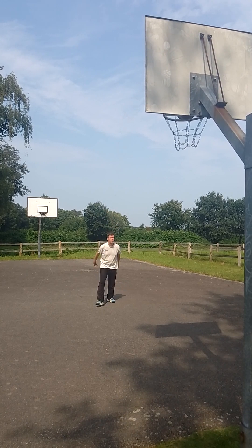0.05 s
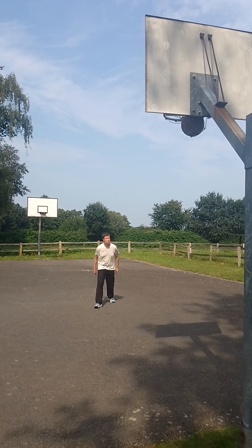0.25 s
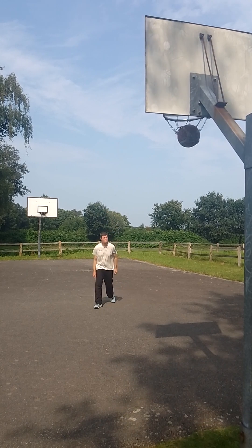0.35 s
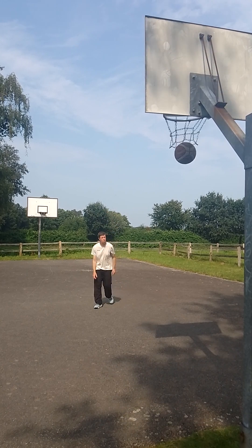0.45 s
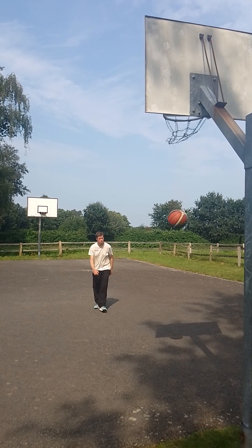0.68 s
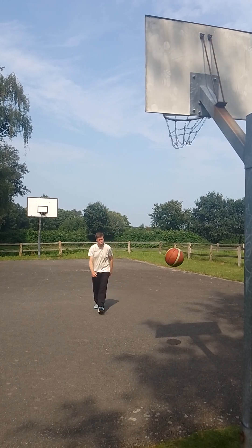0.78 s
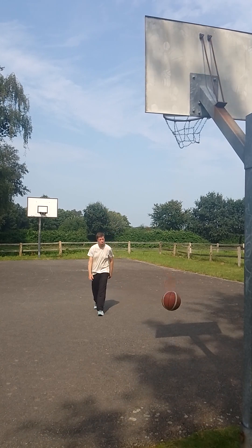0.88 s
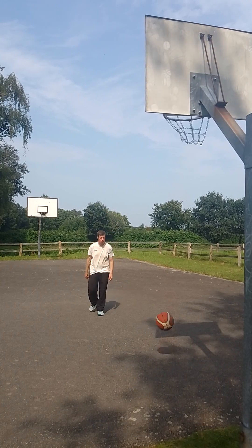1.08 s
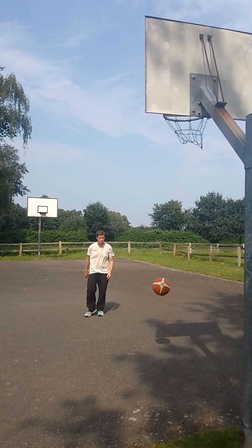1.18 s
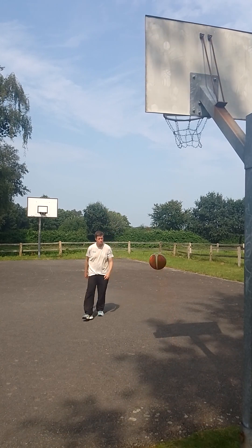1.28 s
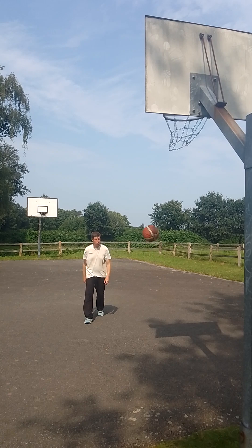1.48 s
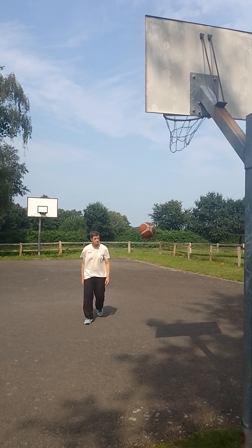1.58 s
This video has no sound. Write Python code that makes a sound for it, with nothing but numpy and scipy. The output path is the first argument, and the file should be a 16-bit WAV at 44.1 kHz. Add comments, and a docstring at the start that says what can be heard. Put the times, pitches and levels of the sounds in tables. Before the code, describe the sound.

A basketball rattles through a chain-net hoop, links tinkle, then it bounces once on asphalt outdoors

```python
"""An open court outdoors: a basketball drops through a hoop with a chain net, then bounces once on asphalt.
Random link contacts, shaped in bursts, excite the damped modes of rim and backboard; the links then tinkle
through narrow resonances as the net swings out. The bounce is a slap of short skin modes and its duller echo,
a swell of mid-band noise, the ringing air inside the ball and scattered noise, with a thin high tone after it.
Filtered clicks give the faint scuff of shoes; shaped noise gives the insects in the grass and the open air."""
import sys
import numpy as np
from scipy import signal
from scipy.fft import rfft, irfft
from scipy.io import wavfile

SR = 44100
rng = np.random.default_rng(int(sys.argv[2]) if len(sys.argv) > 2 else 0)


def int16_out(signal):
    """Quantize to a 16-bit WAV file."""
    q = np.round(np.clip(np.atleast_2d(signal).T, -1, 1) * 32767)
    wavfile.write(sys.argv[1], SR, q.astype(np.int16))


N = 72765  # samples


def undb(db):
    """Amplitude ratio of a level in decibels."""
    return 10 ** (np.asarray(db) / 20)


def unit(x):
    """Normalisation to a root-mean-square value of 1."""
    return x / np.sqrt(np.mean(x ** 2))


def since(start):
    """Elapsed time in seconds since a moment, zero before it."""
    return np.maximum(np.arange(N) / SR - start, 0)


def decay(t, t60):
    """Exponential damping: the amplitude falls by 60 dB in t60 seconds."""
    return np.exp(-np.log(1000) * t / t60)


def burst(start, rise, t60):
    """Envelope of a transient: linear rise, then exponential decay."""
    return np.minimum(since(start) / rise, 1) * decay(since(start + rise), t60)


def colour(x, points):
    """Minimum-phase filtering: the folded cepstrum makes a causal filter of unit power gain."""
    hz, db = np.array(points).T
    grid_hz = np.arange(N + 1) * SR / (2 * N)
    gain = undb(np.interp(np.log(grid_hz + 1), np.log(hz), db))
    cepstrum = irfft(np.log(unit(gain)))
    cepstrum[1:N] *= 2
    cepstrum[N + 1:] = 0
    response = np.exp(rfft(cepstrum))
    return irfft(rfft(x, 2 * N) * response)[:N]


def band(x, hz, kind, order=2):
    """Butterworth filtering: a maximally flat passband."""
    return signal.sosfilt(signal.butter(order, hz, kind, fs=SR, output="sos"), x)


def around(x, hz, width):
    """Band-pass filtering as a narrow resonance centred on one frequency."""
    return band(x, [hz - width / 2, hz + width / 2], "band")


def noise():
    """White noise: equal expected power at every frequency."""
    return rng.standard_normal(N)


def clicks(rate):
    """Random impulses: contacts at an average rate per second, of uneven strength and either sign, rms 1."""
    spread_db = 4
    contact = rng.random(N) < rate / SR
    sign = np.sign(noise())
    strength = undb(spread_db * np.clip(noise(), -2, 2))
    return unit(contact * sign * strength)


def ring(modes, start):
    """Modal superposition: modes struck together build up and decay; neighbours swing opposite ways."""
    build_cycles = 1  # time constant of the build-up, in cycles of the mode
    t = since(start)
    total = 0
    for k, (hz, db, t60) in enumerate(modes):
        swing = (-1) ** k * undb(db) * np.sin(2 * np.pi * hz * t)
        build_up = 1 - np.exp(-t * hz / build_cycles)
        total = total + swing * build_up * decay(t, t60)
    return total


def through(x, response):
    """Convolution: a linear system driven by x, its impulse response scaled to unit energy."""
    return signal.fftconvolve(x, unit(response))[:N] / np.sqrt(N)


def metal(t60, count):
    """Modal density: inharmonic modes, one at a random place in each equal slice of the spectrum."""
    bins = ((np.arange(count) + rng.random(count)) * (N // 2) / count).astype(int)
    lines = np.zeros(N // 2 + 1, complex)
    lines[bins] = np.exp(2j * np.pi * rng.random(count))
    return irfft(lines, N) * burst(0, 0.0016, t60)


def outdoors():
    """Spectral shaping of noise: insects buzz in a narrow high band over quiet open air."""
    # spectra of insects and open air, relative per hertz: f/Hz, level/dB
    insect_spectrum = [(6000, -35), (7600, -19.5), (8150, 4.5), (8600, -6), (9200, 6.5), (9800, -1),
                       (10500, -20.5), (14000, -32)]
    air_spectrum = [(25, -1), (60, 0), (110, -10.5), (160, -18), (350, -3.5), (950, -8), (1600, -16.5),
                    (4000, -22), (10000, -20.5), (15000, -25.5)]
    # level of the insects over time: t/s, level/dB
    buzz_level = [(0, -86.5), (0.2, -83.5), (0.6, -69), (0.95, -71.5), (1.2, -70), (1.36, -68.5),
                  (1.65, -66.5)]
    air_db = -76.5

    when, db = np.array(buzz_level).T
    insects = undb(np.interp(since(0), when, db)) * colour(noise(), insect_spectrum)
    return insects + undb(air_db) * colour(noise(), air_spectrum)


def hoop():
    """Forced vibration: bursts of chain clicks drive other links, rim modes and backboard; the pole shudders."""
    # ball against rim and chain: start t/s, relative level/dB, rise/s, decay time t60/s,
    # bass/dB, treble/dB, drive of the rim/dB
    rattle_bursts = [(0.212, -54, 0.00078, 0.034, 16.5, -7.5, -5), (0.217, -39, 0.0026, 0.12, 9, -7.5, -3),
                     (0.229, -39, 0.01, 0.16, 5, 1.5, -1), (0.255, -39.5, 0.0029, 0.053, 4, -1.5, -8),
                     (0.270, -26, .001, 0.084, -10, 3.5, -3), (0.294, -29.5, 0.0077, .12, -3.5, -6.5, 4),
                     (0.383, -37.5, 0.0023, 0.076, -16, 5.5, -6),
                     (0.411, -36, 0.0041, 0.13, -0.5, -0.5, -1.5),
                     (0.485, -51.5, 0.0088, 0.27, 5.5, 6, 4.5)]
    # modes of rim and backboard: f/Hz, relative level/dB, t60/s
    hoop_modes = [(319.9, -9.5, 0.73), (381.7, -8, 0.52), (507, 1.5, 0.39), (717, 2.5, .55), (938, 0, 0.6),
                  (1043, -8, 0.38), (1209, -1, .6), (1450, 2.5, .45), (1560, 6.5, 0.58), (1812, -0.5, 0.86),
                  (1975, 1, .2), (2676, 6, 0.35), (2824, 5.5, 0.27), (3200, -14, 0.19), (3725, -4, 0.36)]
    # spectra of chain, clanking links, backboard and pole, relative per hertz: f/Hz, level/dB
    chain_spectrum = [(25, -38.5), (75, -33.5), (190, -14), (250, -20.5), (330, 4.5), (600, -2.5),
                      (1500, -1), (2250, -7.5), (3000, -1.5), (4800, -9), (7500, -7.5), (9300, -3.5),
                      (11000, -13), (15500, -13.5)]
    clank_spectrum = [(200, -18), (700, -3.5), (1600, -0.5), (3300, 3), (5000, -0.5), (9000, -2.5),
                      (15000, -5.5)]
    board_spectrum = [(30, -9), (80, 10), (170, -2), (300, 0), (700, -3), (2000, 1), (4500, -6),
                      (9000, -3.5), (15000, -1.5)]
    pole_spectrum = [(30, -32.5), (80, -9), (170, -3), (225, 6.5), (300, -0.5), (600, -26.5), (2000, -48)]
    contacts_per_s, bass_hz, treble_hz = 3000, 900, 4230
    direct_db, rim_gain_db = -3, -13
    clank_db, clank_t60_s = -3.5, 0.1
    board_db, board_t60_s = -7, 0.75
    pole_db, pole_s, pole_rise_s, pole_t60_s = -63.5, 0.22, 0.14, 0.52

    chain = colour(clicks(contacts_per_s), chain_spectrum)
    bass = band(chain, bass_hz, "low", order=1)
    treble = band(chain, treble_hz, "high", order=1)
    middle = chain - bass - treble

    rattle = clank = rim_drive = 0
    for start, db, rise, t60, bass_db, treble_db, rim_db in rattle_bursts:
        balanced = middle + undb(bass_db) * bass + undb(treble_db) * treble
        shake = undb(db) * burst(start, rise, t60) * balanced
        rattle = rattle + shake
        # each burst clanks a fresh set of links
        clank = clank + through(shake, metal(clank_t60_s, count=75))
        rim_drive = rim_drive + undb(rim_db) * shake

    direct = undb(direct_db) * rattle
    clanking = undb(clank_db) * colour(clank, clank_spectrum)
    board_response = colour(metal(board_t60_s, count=2500), board_spectrum)
    board = undb(board_db) * through(rattle, board_response)
    rim = undb(rim_gain_db) * through(rim_drive, ring(hoop_modes, 0))
    pole = undb(pole_db) * colour(noise(), pole_spectrum) * burst(pole_s, pole_rise_s, pole_t60_s)
    return direct + clanking + board + rim + pole


def net():
    """Resonance under random impact: flurries of contacts ring the steel links very high, with a tail."""
    # links tinkling against each other: start t/s, level/dB, t60/s, upper resonances/dB
    flurries = [(0.231, -41, 0.2, 0), (0.255, -41, .12, 0), (0.32, -46, 0.28, -2), (0.413, -47.5, 0.23, -2),
                (0.443, -52, .1, 4), (0.492, -47, .2, -1), (0.522, -38, 0.041, 2.5), (0.59, -61.5, 0.2, 2),
                (0.658, -53, 0.089, 3), (0.669, -58.5, 0.044, 2), (0.699, -58, .07, -8),
                (0.714, -49, 0.13, -5), (0.745, -59, 0.06, 5), (0.784, -52.5, 0.053, 4),
                (0.83, -56, .12, -5), (0.854, -44.5, 0.037, -13), (0.886, -55.5, 0.046, 1),
                (0.921, -59, 0.092, 4), (0.955, -54, 0.063, -8), (0.997, -68.5, 0.11, -1.5)]
    # lower and upper link resonances: f/Hz, width/Hz, relative level/dB
    lower_links = [(9800, 650, -15), (12470, 460, -1.5), (12900, 350, -9.5)]
    upper_links = [(13780, 470, -3.5), (14850, 250, -13)]
    contacts_per_s, rise_s = 2800, 0.005
    tail_db, tail_t60_s = -8, 0.37

    contacts = clicks(contacts_per_s)
    lower = sum(undb(db) * around(contacts, hz, width) for hz, width, db in lower_links)
    upper = sum(undb(db) * around(contacts, hz, width) for hz, width, db in upper_links)
    tinkle = 0
    for start, db, t60, upper_db in flurries:
        links = unit(lower + undb(upper_db) * upper)
        tinkle = tinkle + undb(db) * burst(start, rise_s, t60) * links
    tail = through(tinkle, noise() * burst(0, 0.002, tail_t60_s))
    return tinkle + undb(tail_db) * tail


def steps():
    """Granular friction: soles crunch lightly on loose grit in many small contacts."""
    # shoes on grit: start t/s, level/dB, t60/s
    scuffs = [(0.776, -62, 0.15), (0.942, -63.5, 0.29), (1.415, -64, .04), (1.435, -63.5, 0.075),
              (1.449, -68.5, 0.12), (1.477, -69, 0.081)]
    # spectrum of the grit, relative per hertz: f/Hz, level/dB
    grit_spectrum = [(60, -22), (170, 0.5), (400, -18), (950, 9), (1300, -1), (1800, 0.5), (2800, 3.5),
                     (4500, -11), (9000, -2), (15000, -24)]
    envelope = sum(undb(db) * burst(start, 0.0021, t60) for start, db, t60 in scuffs)
    return colour(clicks(3700), grit_spectrum) * envelope


def hooks():
    """Resonance under friction: the swinging chain tugs at its hooks, and scraping noise makes them ping."""
    # tugs of the chain: start t/s, relative level/dB
    tugs = [(0.777, -63), (0.879, -65), (0.946, -61.5)]
    # hook modes: f/Hz, relative level/dB, t60/s
    hook_modes = [(960, -7.5, 0.28), (1542, -4, 0.47), (1840, 0.5, 0.17), (2315, -10, 0.9),
                  (2675, -0.5, 0.21), (2880, -21, 0.33)]
    rise_s, t60_s = 0.0067, 0.1
    scrape = noise() * sum(undb(db) * burst(start, rise_s, t60_s) for start, db in tugs)
    return through(scrape, ring(hook_modes, 0))


def bounce():
    """Impact excitation and reflection: slap, duller echo, noise swell, air modes, scatter from fence and trees."""
    # modes of the skin slapping the ground, of the duller echo off the backboard or pole,
    # and of the air inside the ball: f/Hz, relative level/dB, t60/s
    slap_modes = [(91.8, -2, 0.027), (351, -3.5, 0.024), (774, 5.5, 0.015), (960, -11.5, 0.036),
                  (1613, -1.5, 0.016), (2830, 6.5, 0.0053), (3395, 7, 0.0041), (6350, 3.5, 0.0029),
                  (8250, -11.5, 0.018), (9940, -12.5, 0.014), (12700, -17, 0.0085)]
    echo_modes = [(340, -2.5, 0.029), (850, 4.5, 0.012), (1600, -4.5, 0.007), (2910, -3, 0.0025),
                  (7240, -5, 0.00164)]
    cavity_modes = [(868, 0, 0.45), (1637, 1.5, 0.25), (2487, -27, .3), (2750, -5, 0.31), (2760, -2, .4),
                    (3277, 6.5, 0.17), (3480, -27, 0.23), (3741, -7.5, 0.55)]
    # spectrum scattered by the surroundings, relative per hertz: f/Hz, level/dB
    surround_spectrum = [(50, -15), (110, -1), (170, -5), (320, -3.5), (900, 5), (1300, -3.5), (1700, 1),
                         (2200, -4.5), (3200, 2.5), (4600, -15.5), (6300, -4.5), (9000, -3.5), (13000, -22)]
    bounce_s, slap_db, cavity_db = 1.1236, -25, -55
    echo_delay_s, echo_db = 0.0118, -27
    swell_lead_s, swell_s, swell_db = 0.003, 0.016, -41
    scatter_delay_s, scatter_rise_s, scatter_t60_s, scatter_db = 0.0053, 0.04, 0.5, -52

    slap = undb(slap_db) * ring(slap_modes, bounce_s)
    echo = undb(echo_db) * ring(echo_modes, bounce_s + echo_delay_s)

    # a short half-sine swell of mid-band noise around the impact, starting just before the slap
    half_sine = np.sin(np.pi * np.minimum(since(bounce_s - swell_lead_s) / swell_s, 1))
    swell = undb(swell_db) * half_sine * unit(band(noise(), [600, 1300], "band"))

    cavity = undb(cavity_db) * ring(cavity_modes, bounce_s)
    spread = burst(bounce_s + scatter_delay_s, scatter_rise_s, scatter_t60_s)
    scatter = undb(scatter_db) * colour(noise(), surround_spectrum) * spread
    return slap + echo + swell + cavity + scatter


def thin_tone():
    """Narrow-band noise: its random envelope makes a faint, wavering pair of high notes after the bounce."""
    # the two notes: f/Hz, width/Hz, relative level/dB
    note_bands = [(2890, 34, -3.5), (3520, 40, -12.5)]
    # level of the pair over time: t/s, level/dB
    tone_level = [(1.2, -100), (1.28, -71), (1.37, -74.5), (1.395, -81), (1.44, -65.5), (1.501, -81.5),
                  (1.65, -89.5)]
    when, db = np.array(tone_level).T
    notes = sum(undb(note_db) * unit(around(noise(), hz, width)) for hz, width, note_db in note_bands)
    return undb(np.interp(since(0), when, db)) * notes


def scene():
    """Superposition: the pressures of all sources add at one microphone."""
    return (outdoors() + hoop() + net() + steps() + hooks() + bounce() + thin_tone())[None]


def record(dry):
    """Linear filtering: the microphone dips in the upper bass and loses rumble; the recorder cuts the top."""
    dip_hz, dip_width_hz, low_hz, cutoff_hz = 168, 75, 30, 15600
    dip_edges = [dip_hz - dip_width_hz / 2, dip_hz + dip_width_hz / 2]
    hollow = band(dry, dip_edges, "bandstop", order=1)
    without_rumble = band(hollow, low_hz, "high", order=1)
    # steep elliptic low-pass: 0.2 dB ripple, 80 dB rejection
    top_cut = signal.ellip(10, 0.2, 80, cutoff_hz, fs=SR, output="sos")
    return signal.sosfilt(top_cut, without_rumble)


dry = scene()
out = record(dry)
int16_out(out)
```